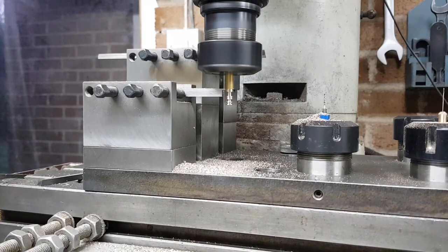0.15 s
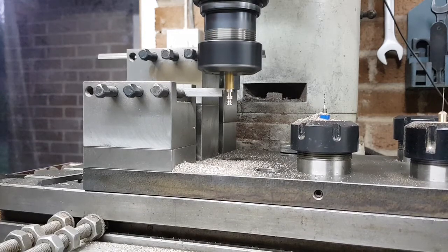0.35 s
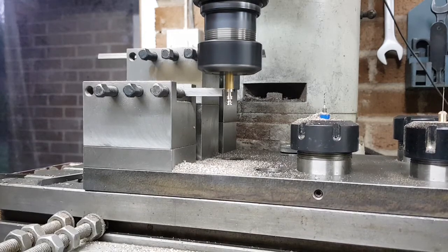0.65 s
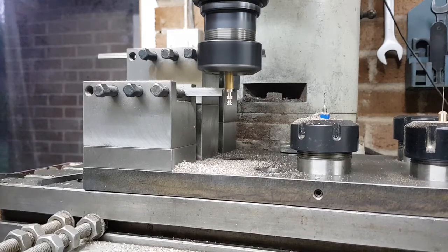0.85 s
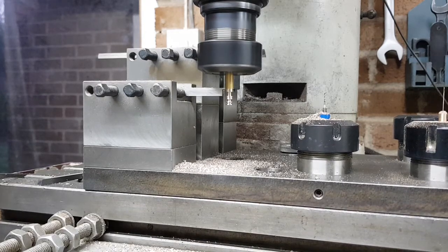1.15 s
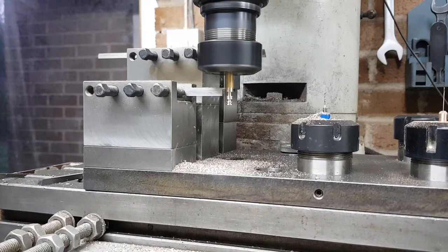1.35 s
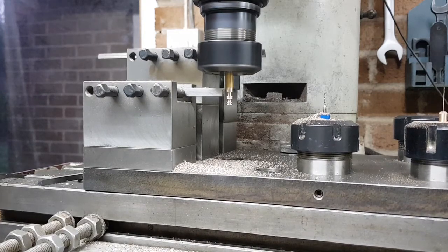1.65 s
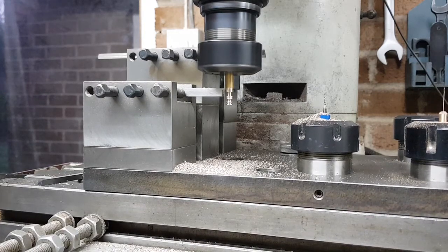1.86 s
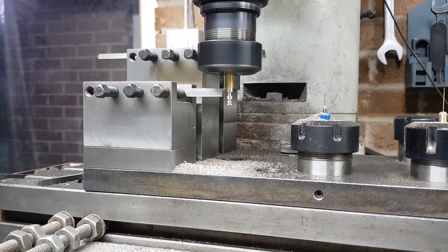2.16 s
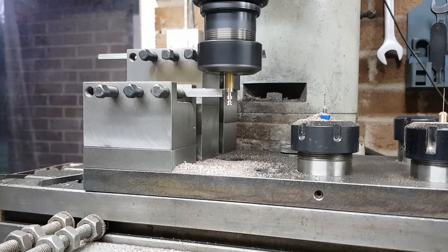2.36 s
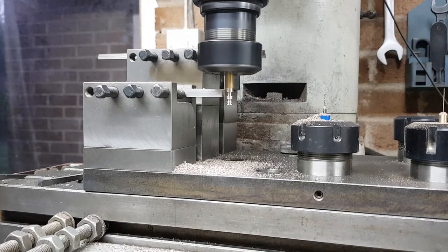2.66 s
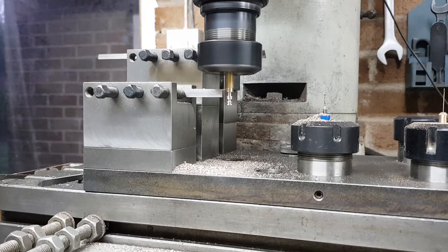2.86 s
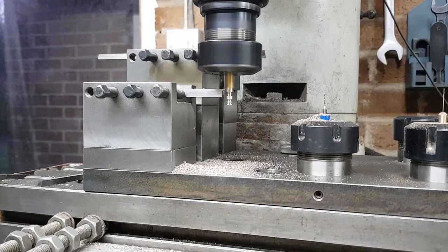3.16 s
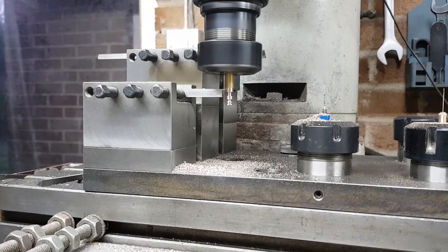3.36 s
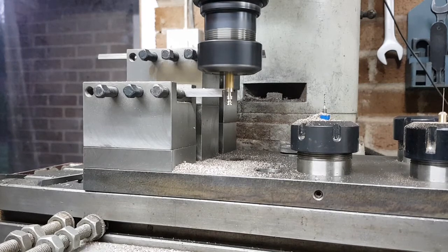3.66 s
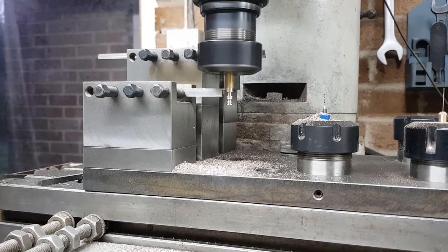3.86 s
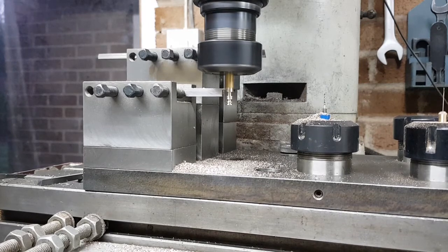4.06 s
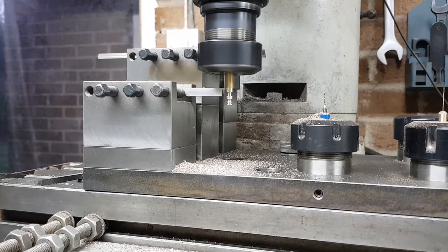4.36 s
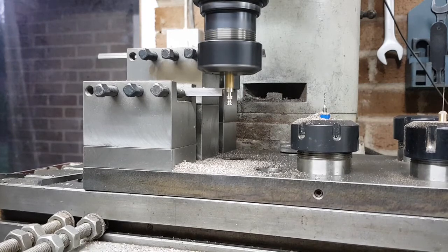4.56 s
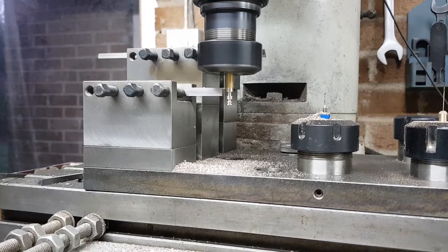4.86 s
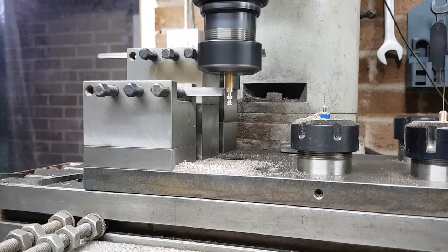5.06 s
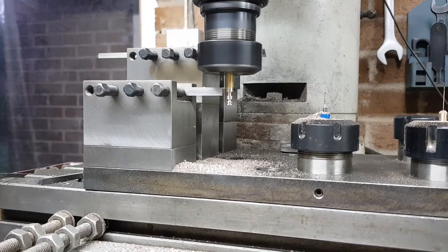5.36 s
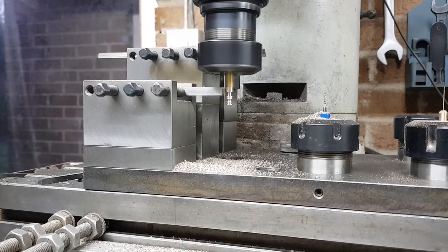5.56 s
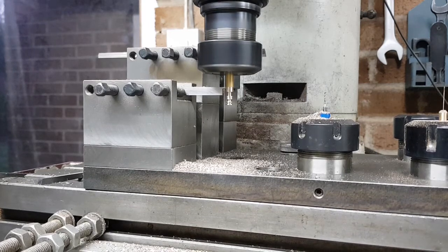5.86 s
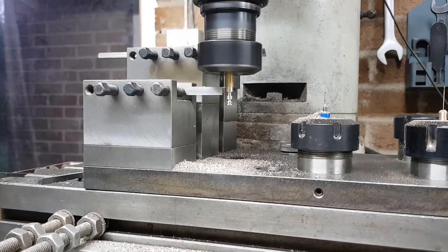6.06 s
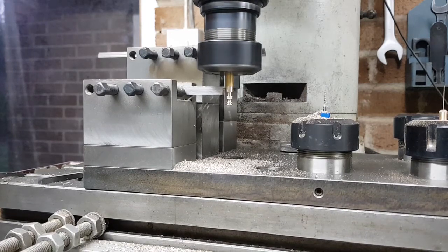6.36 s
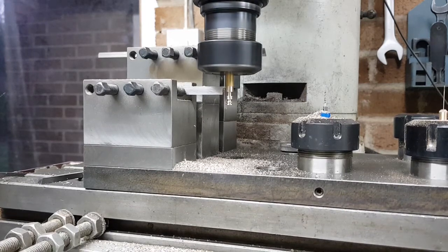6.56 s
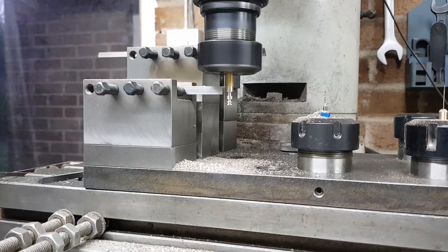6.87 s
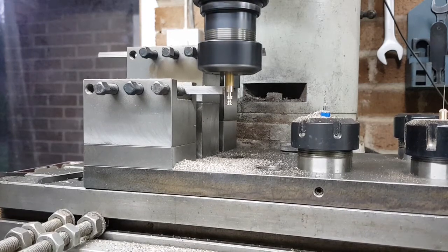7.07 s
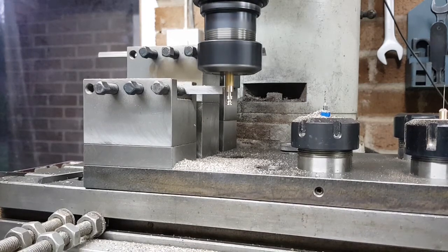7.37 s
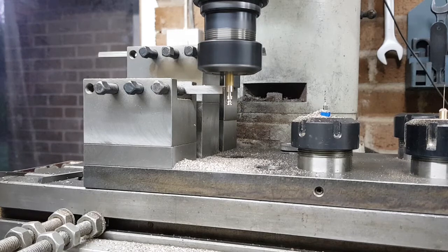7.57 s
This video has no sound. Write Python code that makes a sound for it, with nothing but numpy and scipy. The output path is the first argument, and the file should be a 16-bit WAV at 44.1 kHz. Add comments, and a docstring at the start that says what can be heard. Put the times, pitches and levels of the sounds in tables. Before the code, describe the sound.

A belt-driven milling machine runs throughout, close by in a workshop: a steady motor hum, a thin high whine, and belts thrumming, rubbing and knocking lightly in a fast rhythm. At about 1 second a fixed tool starts to scrape a spinning brass bar. From 1.3 to 2 seconds come three loud, shrill, throbbing squeals, the last digging in with a sharp, very high rasp and fading by 2.5 seconds. The machine sound dips under these squeals and comes back up at about 3 seconds, running alone until 5. Then the cut resumes with a softer, rougher squeal and a fine hiss of chips. The squeal thins out after 5.6 seconds, swells with a fast flutter from 6.4, and spikes in a brief loud shriek near 6.9. Squealing and rasping continue over the hum until the end, at about 7.7 seconds.

```python
"""Turning brass on a mill.

A belt-driven spindle turns a brass bar against a fixed tool, close to a camera in a workshop.
The motor hums, its drive whines, two belts thrum, knock and rub in the frame. In the cut the tool
tip rasps and the bar chatters into a throbbing squeal. Gain control ducks under the loudest squeals."""
import sys
import numpy as np
from scipy.fft import rfft, irfft, next_fast_len
from scipy.io import wavfile
from scipy.ndimage import uniform_filter1d, minimum_filter1d, map_coordinates

SR = 44100
rng = np.random.default_rng(int(sys.argv[2]) if len(sys.argv) > 2 else 0)


def bounce(signal):
    """Save signal as a 16-bit WAV file at the path given by the first command-line argument."""
    frames = np.transpose(np.atleast_2d(signal))
    limited = np.clip(frames, -1, 1)
    pcm = np.round(limited * 32767).astype(np.int16)
    wavfile.write(sys.argv[1], SR, pcm)


N = 340442

MOTOR_HZ, SPINDLE_HZ = 24.831, 28.3
FAST_BELT_HZ, SLOW_BELT_HZ = MOTOR_HZ / 2, 5.436
SQUEAL_ATTACK_S, SQUEAL_RELEASE_DB_PER_S = 0.064, 170.5

# Frame resonances: centre_hz, width_hz, density_db
FRAME_MODES = [(72, 17, -65.5), (92.5, 18, -68), (158.7, 29, -60.5), (226.5, 20.2, -50), (272, 62, -64),
               (332, 46, -64.5), (391, 16, -73), (497, 63, -64.5), (573, 32, -67), (646, 56, -71),
               (774, 67, -66), (868, 107, -66), (1241, 136, -66), (1390, 355, -70.5), (1609, 27.5, -63.5),
               (1972, 93, -70.5), (2138, 55, -64.5), (2285, 60, -72.5), (2620, 84, -71.5),
               (3020, 59, -73.5), (3310, 63, -74.5), (4000, 120, -74.5), (5670, 160, -77.5)]
# Bearing and belt noise: freq_hz, density_db
RUNNING_NOISE = [(20, -114), (34, -100), (43, -76), (125, -77), (300, -68), (700, -71), (1030, -76.5),
                 (1500, -75), (2400, -75.5), (3600, -78), (6200, -80.5), (7900, -89.5), (10000, -91.5),
                 (12000, -87.5), (15700, -94)]
# Share of the noise repeating with the belts: freq_hz, power_share
LAP_SHARE = [(100, .65), (500, .72), (1200, .55), (2500, .4), (5000, .02)]
# Left-right likeness of the frame: freq_hz, coherence
COHERENCE = [(200, 0.96), (400, 0.91), (700, 0.61), (1400, 0.29), (3000, 0.051), (12000, 0.036)]

# Motor hum: motor_multiple; level_db
HUM_ORDERS = [4, 10, 11, 12]
HUM_DB = [-50, -40, -43.5, -47.5]
# Singing motor bearings: motor_multiple; level_db
BEARING_ORDERS = [16, 19, 23, 34]
BEARING_DB = [-55, -48, -49.5, -51.5]
# Slow belt thrum: lap_multiple; level_db
THRUM_ORDERS = [13, 16, 28, 39, 40, 42, 155]
THRUM_DB = [-50, -62, -52, -49, -47, -47.5, -62]
# Pulley struck by the fast belt: lap_multiple; relative_db
KNOCK_ORDERS = [106, 108, 109, 110, 111, 112, 113, 114, 116]
KNOCK_DB = [-81, -56, -52.5, -53, -53, -67, -54.5, -47.5, -44.5]
# Fast belt on a flange: lap_multiple; level_db
RUB_ORDERS = [212, 215, 222, 223, 224]
RUB_DB = [-70, -61, -54, -54.5, -53]

# Drive switching tones and their top cluster: pitch_hz, relative_db
WHINE_TONES = [(5997, -52.5), (6024, -64.5), (6142, -72), (7510, -63.5), (8947, -67), (9039, -83),
               (11956, -57), (11989, -62.5)]
TOP_WHINE_TONES = [(15014.5, -58), (14971, -69), (15036, -66)]
# Switching sidebands: centre_hz, width_hz, relative_db
SIDEBANDS = [(6030, 200, 2), (8900, 220, -15), (12000, 220, -4), (15010, 110, -1)]

# Tool tip scrapes: start_s, length_s, attack_s, level_db, growth_db_per_s, cut_depth
SCRAPES = [(1.05, 0.22, .1, -51, 26, 0), (1.288, 0.046, 0.055, -32, 10, 0), (1.42, .26, .05, -41, 20, .5),
           (1.698, 0.19, .007, -17.5, 5, 1), (1.947, 0.19, .05, -27, -11, 0.9),
           (2.207, 0.19, .05, -40.5, 0, 0.32), (2.724, .1, .08, -52, 20, 0),
           (4.98, 0.098, .015, -44, 20, 0.1), (5.15, 1.08, .1, -45.5, 2.5, 0),
           (6.39, 0.13, 0.16, -34, 6, 0.05), (6.62, 1.04, 0.11, -39, 2.5, 0)]
# Tip resonances, light and deep cut: centre_hz, width_hz, relative_db
TIP_LIGHT_MODES = [(13180, 320, -1), (13450, 540, -3)]
TIP_DEEP_MODES = [(13360, 290, 6), (13500, 490, -14), (9080, 260, -16)]
# Hiss of fine chips: freq_hz, relative_db
CHIP_SPECTRUM = [(3000, -30), (6000, -2), (9000, -8), (12000, -5), (15500, 1)]
# Tip snatching at the bar: time_s, level_db, pitch_hz
SNATCHES = [(1.3055, -13, 14000), (1.6915, -12, 13700), (1.988, -19, 13400)]

# Chatter bouts: start_s, length_s, level_db, growth_db_per_s, pitch_hz,
# throb_depth, throb_hz, roughness, third_harmonic_db, pan_db
SQUEALS = [(1.318, .13, -20, -30, 4568, .5, 23, .003, -22, 4),
           (1.505, .17, -18.5, -14, 4600, .15, 23, .003, -9, 3),
           (5.02, .54, -29.3, -10, 4590, .35, 28, .08, -28, 4),
           (5.6, .78, -42, 0, 4597, .3, 28, .08, -30, 1),
           (6.432, .4, -32, 12, 4586, .85, 22.5, .03, -30, 4),
           (6.89, .055, -16.5, -10, 4567, .1, 28, .002, -26, 16),
           (7.03, .21, -32.5, -14, 4568, .45, 26, .02, -30, 7),
           (7.28, .4, -30.5, -1, 4565, .2, 26, .01, -30, 11)]
# Noise bands of loose chatter: offset_hz, width_hz, relative_db
LOOSE_BANDS = [(-10, 170, 0), (-250, 260, -9)]


def amp(db):
    """Decibels to gain."""
    return 10 ** (np.asarray(db) / 20)


def unit(x):
    """Scale to rms 1."""
    return x / np.sqrt(np.mean(np.abs(x) ** 2) + 1e-20)


def clock():
    """Sample times in seconds."""
    return np.arange(N) / SR


def along(points, hz):
    """Interpolate (freq_hz, value) points on a log axis."""
    freq_hz, values = np.transpose(points)
    return np.interp(np.log(hz + 1), np.log(freq_hz + 1), values)


def wobble(rate_hz):
    """Smooth random curve."""
    return map_coordinates(rng.standard_normal(int(N * rate_hz / SR) + 4), [clock() * rate_hz])


def filtered(x, response):
    """Apply a frequency response."""
    size = next_fast_len(N + SR // 4)
    return irfft(rfft(x, size) * response(np.fft.rfftfreq(size, 1 / SR)), size)[..., :N]


def peaks(modes, hz, order=1):
    """Power response of resonances; higher order, steeper sides."""
    return sum(amp(db) ** 2 / (1 + ((hz - centre_hz) / (0.62 * width_hz)) ** (2 * order)) ** 2
               for centre_hz, width_hz, db in modes)


def ringing(modes):
    """Analytic noise in the given resonances, rms 1."""
    hz = np.fft.fftfreq(next_fast_len(N), 1 / SR)
    spectrum = np.sqrt(peaks(modes, hz, order=2)) * np.exp(2j * np.pi * rng.random(len(hz)))
    return unit(np.fft.ifft(spectrum)[:N])


def placed(z, pan_db, lead_rad):
    """Analytic signal to two microphones; positive pan and lead favour the left."""
    left, right = amp(pan_db / 2), amp(-pan_db / 2)
    pair = [left * z * np.exp(.5j * lead_rad), right * z * np.exp(-.5j * lead_rad)]
    return 2 / np.hypot(left, right) * np.real(pair)


def tones(turns, orders, levels_db, smear=0.25):
    """Harmonics of a rotation; zero smear gives one pulse a turn."""
    return sum(amp(db) * np.exp(2j * np.pi * (k * turns + smear * k * k))
               for k, db in zip(orders, levels_db))


def beating(depth, rate_hz, crest_s):
    """Modulator adding a weaker tone rate_hz lower, in phase at crest_s."""
    return (1 + depth * np.exp(-2j * np.pi * rate_hz * (clock() - crest_s))) / np.sqrt(1 + depth ** 2)


def envelope(start_s, length_s, attack_s, db, growth_db_per_s, release_db_per_s):
    """Swell ending at start_s, sloping hold, release."""
    age_s = clock() - start_s
    rise = np.clip(1 + age_s / attack_s, 0, 1) ** 2
    hold_db = db + growth_db_per_s * np.clip(age_s, 0, length_s)
    return rise * amp(hold_db - release_db_per_s * np.maximum(age_s - length_s, 0))


def blend(values, envelopes):
    """Per-event values to a curve; the loudest event dominates."""
    power = envelopes ** 2 + 1e-14
    return values @ power / power.sum(axis=0)


def belt_roughness(shaft_s, lap_hz):
    """Belt surface: two noises repeating every lap."""
    size = int(SR / lap_hz)
    position = (shaft_s * lap_hz % 1 * size).astype(int)
    return rng.standard_normal((2, size))[:, position]


def frame_noise(shaft_s):
    """Belts and bearings shake the frame, partly repeating each lap."""
    def share(hz):
        return np.clip(along(LAP_SHARE, hz), 0, 1)

    def mid_side_response(hz):
        body = np.sqrt((peaks(FRAME_MODES, hz) + amp(along(RUNNING_NOISE, hz)) ** 2) * SR / 2)
        coherence = np.clip(along(COHERENCE, hz), 0, 1)
        return np.array([body, body * np.sqrt((1 - coherence) / (1 + coherence))])

    laps = unit(belt_roughness(shaft_s, SLOW_BELT_HZ) + 0.93 * belt_roughness(shaft_s, FAST_BELT_HZ))
    repeating = filtered(laps, lambda hz: np.sqrt(share(hz)))
    fresh = filtered(rng.standard_normal((2, N)), lambda hz: np.sqrt(1 - share(hz)))
    mid, side = filtered(repeating + fresh, mid_side_response)
    return np.array([mid + side, mid - side]) * amp([[.6], [-1.6]])


def motor_hum(shaft_s):
    """Hum and bearing tones; the ninth order booms in the frame and beats slowly."""
    turns = shaft_s * MOTOR_HZ
    boom = tones(turns, orders=[9], levels_db=[-35]) * beating(depth=0.53, rate_hz=.49, crest_s=1.27)
    bearings = tones(turns, BEARING_ORDERS, BEARING_DB)
    hum = (boom + bearings + tones(turns, HUM_ORDERS, HUM_DB)) * amp(0.32 * wobble(2.975))
    return placed(hum, pan_db=2, lead_rad=0.18)


def belt_thrum(shaft_s):
    """The slow belt thrums at multiples of its lap rate."""
    thrum = tones(shaft_s * SLOW_BELT_HZ, THRUM_ORDERS, THRUM_DB) * amp(1.2 * wobble(3.92))
    return placed(thrum, pan_db=2, lead_rad=0.18)


def belt_knock_and_rub(shaft_s):
    """Once a lap the fast belt's seam strikes a pulley, then the belt rubs a flange."""
    laps = shaft_s * FAST_BELT_HZ
    knock = tones(laps - .48, KNOCK_ORDERS, KNOCK_DB, smear=0) * amp(3.5 + 0.49 * wobble(13))
    rub = tones(laps - .63, RUB_ORDERS, RUB_DB, smear=0) * (1 + 0.56 * ringing([(0, 270, 0)]))
    return placed(knock, pan_db=1, lead_rad=1.27) + placed(rub, pan_db=1, lead_rad=0.7)


def drive_whine():
    """Wavering switching tones of the motor drive, with noisy sidebands."""
    lines = sum(amp(db + 0.43 * wobble(12) + 2.2 * wobble(70)) * np.exp(2j * np.pi * hz * clock())
                for hz, db in list(WHINE_TONES) + TOP_WHINE_TONES)
    sidebands = amp(-57) * np.array([ringing(SIDEBANDS).real, ringing(SIDEBANDS).real])
    return placed(amp(3) * lines, pan_db=2.5, lead_rad=1.43) + sidebands


def tool_rasp():
    """Tearing chips ring the tip; snatches chirp; light cuts spray fine chips."""
    scrapes = np.array([envelope(*scrape, release_db_per_s=130) for *scrape, _ in SCRAPES])
    level = np.linalg.norm(scrapes, axis=0)
    depth = np.clip(blend(np.array(SCRAPES)[:, -1], scrapes), 0, 1)
    ring = np.sqrt(1 - depth) * ringing(TIP_LIGHT_MODES) + np.sqrt(depth) * ringing(TIP_DEEP_MODES)
    limiting = np.sqrt(1 + (0.47 * depth * np.abs(ring)) ** 2)  # a deep cut limits its own swing
    ring = unit(ring / limiting * (1 + 0.07 * depth))
    throb = 1 + 0.25 * (1 - 0.49 * depth) * np.cos(2 * np.pi * (SPINDLE_HZ * clock() - .24))
    tip = level * amp(1.1 * wobble(60)) * throb * ring
    for time_s, db, hz in SNATCHES:
        tip += amp(db) * np.exp(-((clock() - time_s) / 0.002) ** 2 + 2j * np.pi * hz * clock())
    spray = unit(filtered(rng.standard_normal((2, N)), lambda hz: amp(along(CHIP_SPECTRUM, hz))))
    return placed(tip, pan_db=5.5, lead_rad=-0.96) + level * amp(-4.5) * (1 - depth) * spray


def chatter(swing, pitch_hz, roughness, third_db, pan_db):
    """The bar's bending mode and two overtones; roughness turns tone into narrow noise."""
    roughness = np.clip(roughness, 0, 1)
    phase = 2 * np.pi * np.cumsum(pitch_hz + 3.2 * wobble(40)) / SR
    voice = swing * (np.sqrt(1 - roughness) + np.sqrt(roughness) * ringing(LOOSE_BANDS))
    first = placed(voice * np.exp(1j * phase), pan_db, lead_rad=1.9)
    second = placed(amp(-30) * voice * np.exp(2j * phase), pan_db=2, lead_rad=0)
    third = placed(amp(third_db) * voice * np.exp(3j * phase), pan_db=6, lead_rad=-1.7)
    return first + second + third


def bar_squeal():
    """Chatter bouts; re-cutting the last turn's ripple adds a lower tone, so they throb."""
    bouts = np.array([envelope(start_s, length_s, SQUEAL_ATTACK_S, db, growth, SQUEAL_RELEASE_DB_PER_S)
                      for start_s, length_s, db, growth, *_ in SQUEALS])
    starts_s, _, _, _, pitch_hz, depths, throb_hz, roughness, third_db, pan_db = np.transpose(SQUEALS)
    jitter_s = .004 * wobble(14)
    swing = sum(bout * beating(depth, rate_hz, start_s + jitter_s)
                for bout, depth, rate_hz, start_s in zip(bouts, depths, throb_hz, starts_s))
    flutter_db = 3.5 * blend(depths, bouts) * wobble(24)
    upper_hz = pitch_hz + throb_hz * depths ** 2 / (1 + depths ** 2)  # centres the pair on the pitch
    settings = blend(np.array([upper_hz, roughness, third_db, pan_db]), bouts)
    return chatter(swing * amp(flutter_db), *settings)


def tool_dig():
    """The tool digs in: chatter flares, then fades, sags and breaks into a scrape."""
    start_s, length_s, loosen_s, sag_hz_per_s = 1.71, 0.74, .34, 400
    age_s = np.clip(clock() - start_s, 0, length_s)
    swing = envelope(start_s, length_s, SQUEAL_ATTACK_S, db=-15.5, growth_db_per_s=-38,
                     release_db_per_s=SQUEAL_RELEASE_DB_PER_S)
    swing = swing * beating(depth=0.29, rate_hz=SPINDLE_HZ, crest_s=start_s)
    pitch_hz = 4585 - sag_hz_per_s * age_s
    return chatter(swing, pitch_hz, roughness=age_s / loosen_s, third_db=-13, pan_db=7)


def gain_control(x, threshold_db, slope, window_s, hold_s, glide_s):
    """Loud sound pulls the gain down; it holds, then glides back."""
    window, hold = int(window_s * SR), int(hold_s * SR)
    power = uniform_filter1d(np.mean(x ** 2, axis=0), window, origin=(window - 1) // 2)
    wanted_db = -slope * np.maximum(10 * np.log10(np.abs(power) + 1e-12) - threshold_db, 0)
    held_db = minimum_filter1d(wanted_db, hold, origin=(hold - 1) // 2, mode="nearest")
    return x * amp(uniform_filter1d(held_db, int(glide_s * SR)))


def scene():
    """Machine plus cut; motor and belts share one slightly unsteady speed."""
    shaft_s = clock() + .00012 * wobble(2.5)
    machine = frame_noise(shaft_s) + motor_hum(shaft_s) + belt_thrum(shaft_s)
    machine += belt_knock_and_rub(shaft_s) + drive_whine()
    return machine + bar_squeal() + tool_dig() + tool_rasp()


def record(dry):
    """Camera gain control and band limit."""
    ducked = gain_control(dry, threshold_db=-25.5, slope=0.49, window_s=0.28, hold_s=2.25, glide_s=0.19)
    return filtered(ducked, lambda hz: hz < 15800)


dry = scene()
out = record(dry)
bounce(out)
```